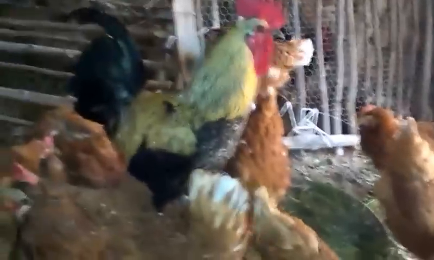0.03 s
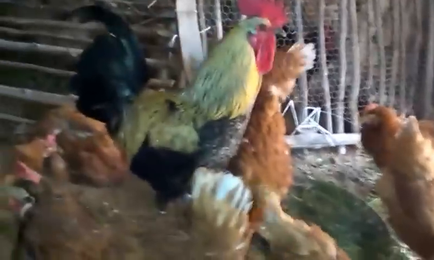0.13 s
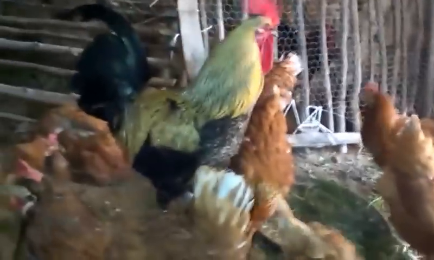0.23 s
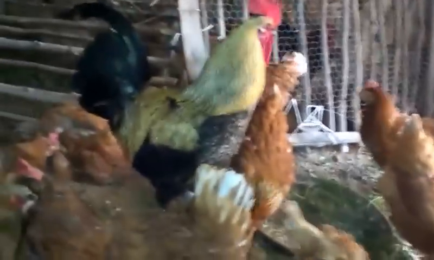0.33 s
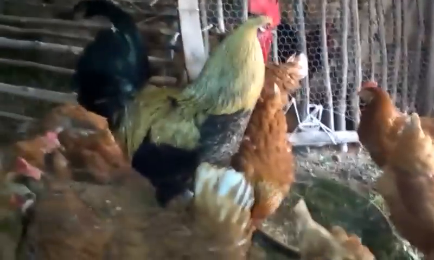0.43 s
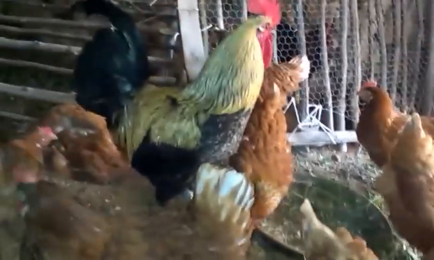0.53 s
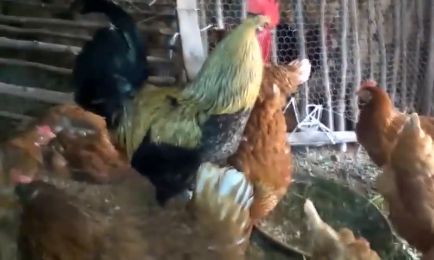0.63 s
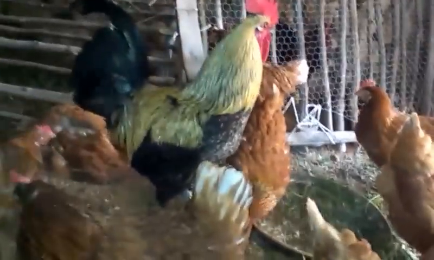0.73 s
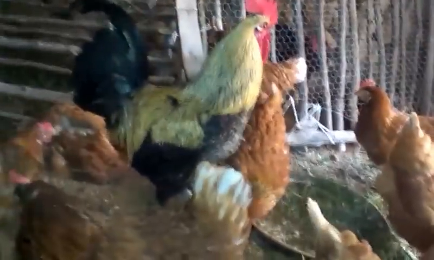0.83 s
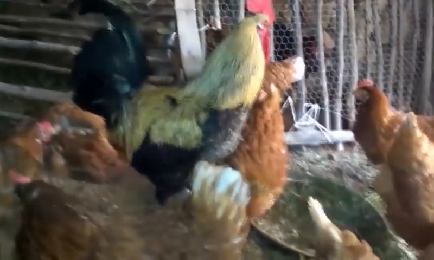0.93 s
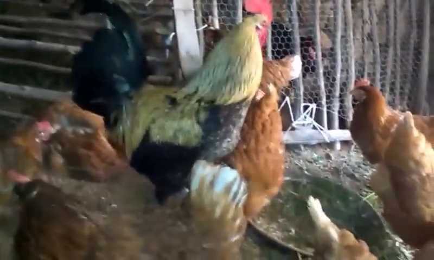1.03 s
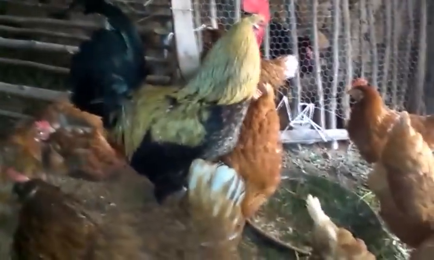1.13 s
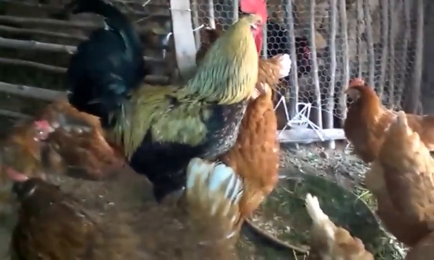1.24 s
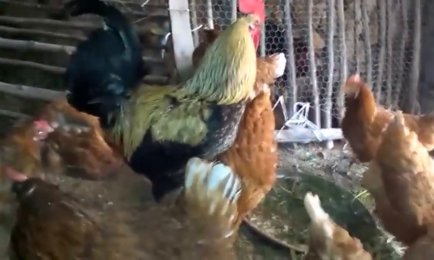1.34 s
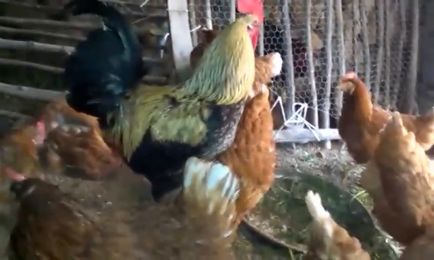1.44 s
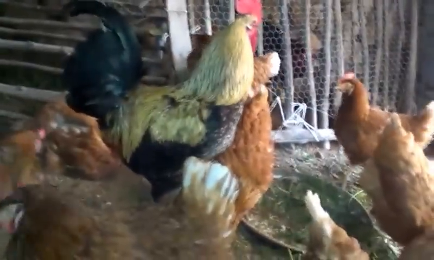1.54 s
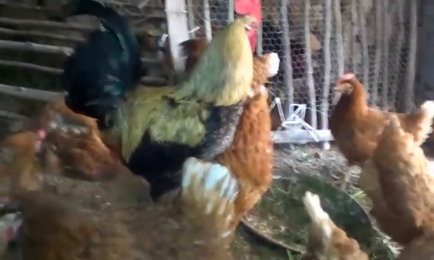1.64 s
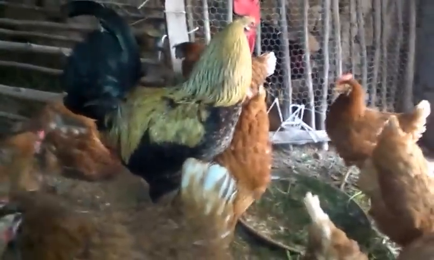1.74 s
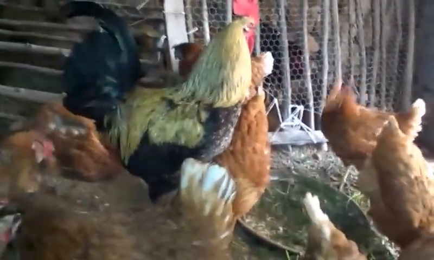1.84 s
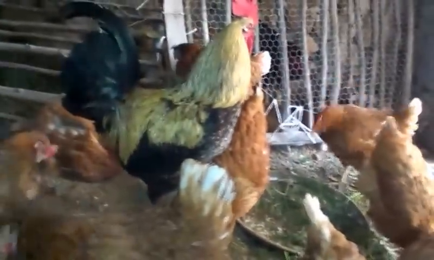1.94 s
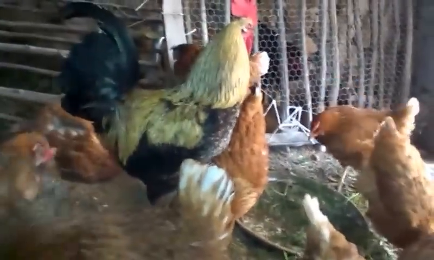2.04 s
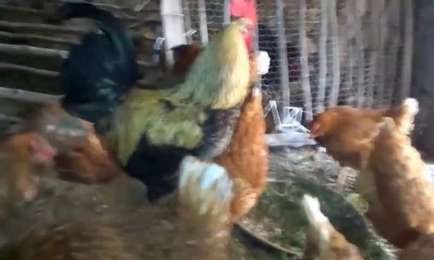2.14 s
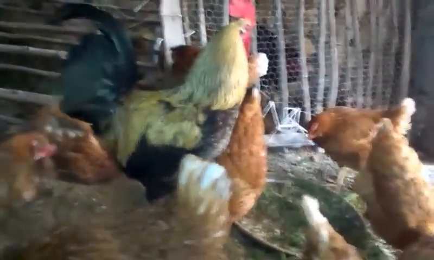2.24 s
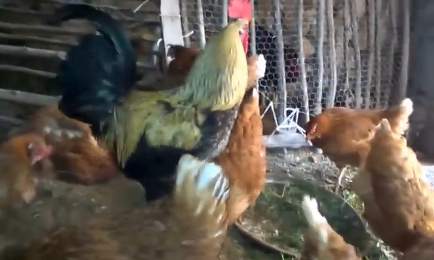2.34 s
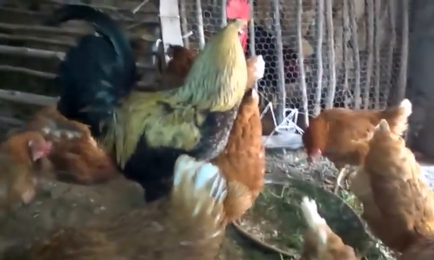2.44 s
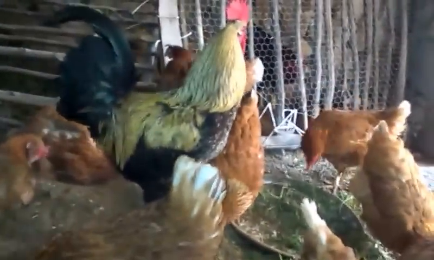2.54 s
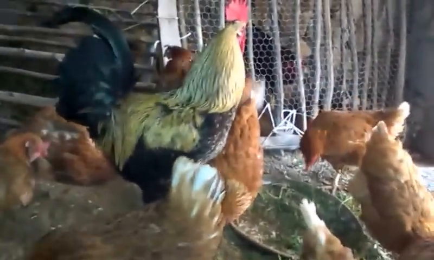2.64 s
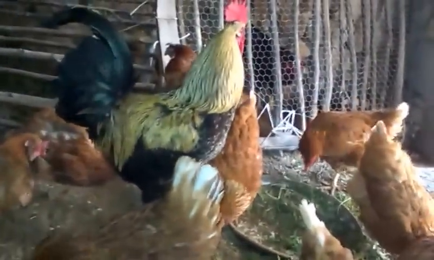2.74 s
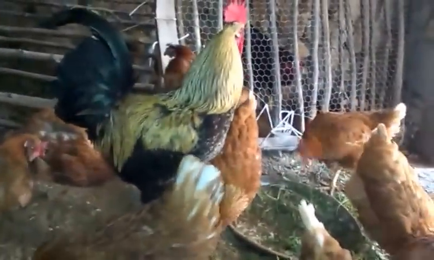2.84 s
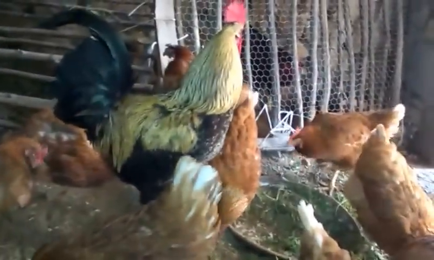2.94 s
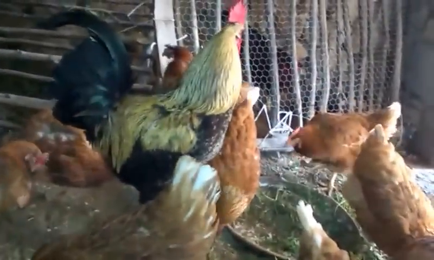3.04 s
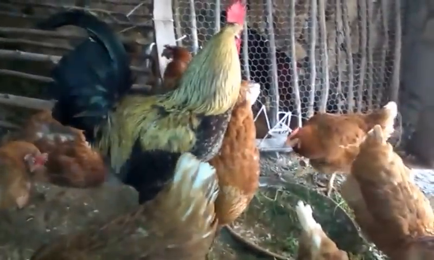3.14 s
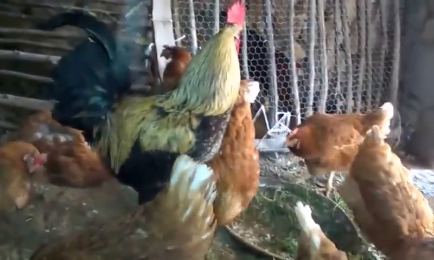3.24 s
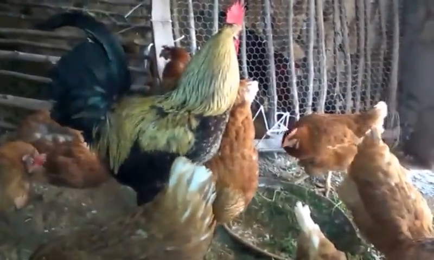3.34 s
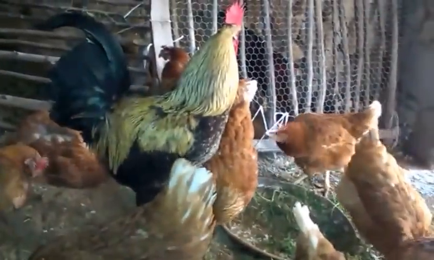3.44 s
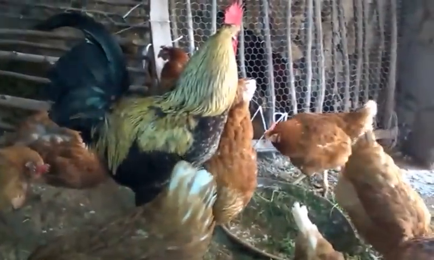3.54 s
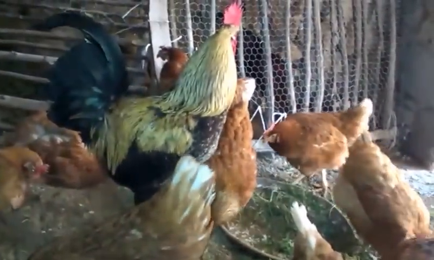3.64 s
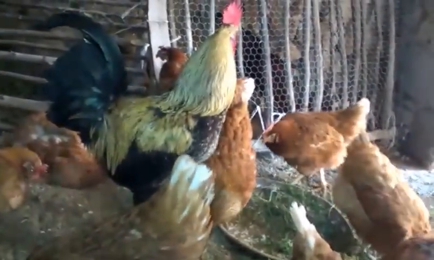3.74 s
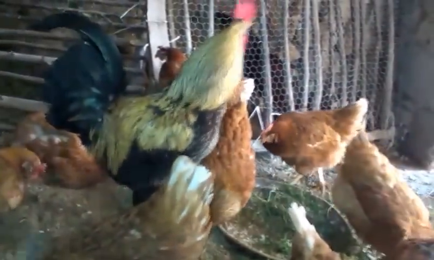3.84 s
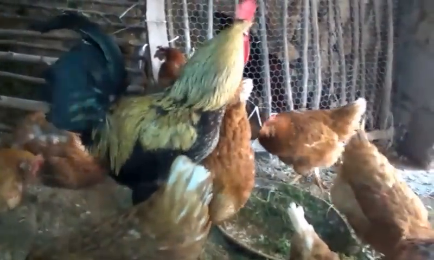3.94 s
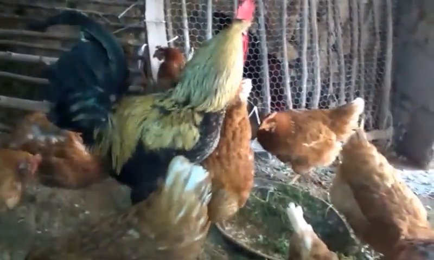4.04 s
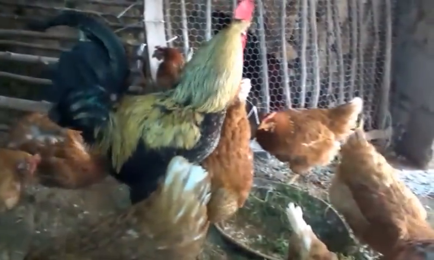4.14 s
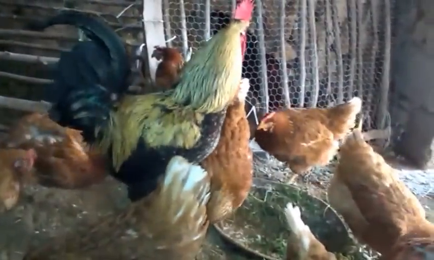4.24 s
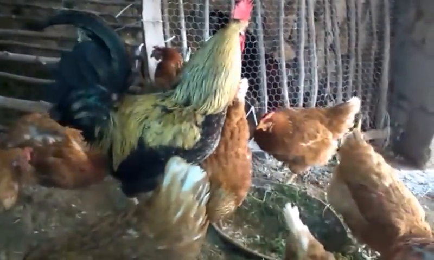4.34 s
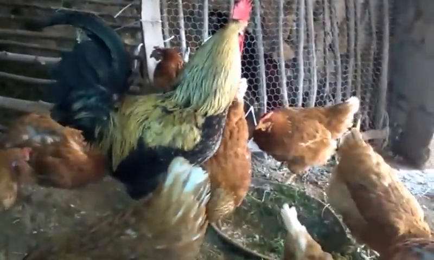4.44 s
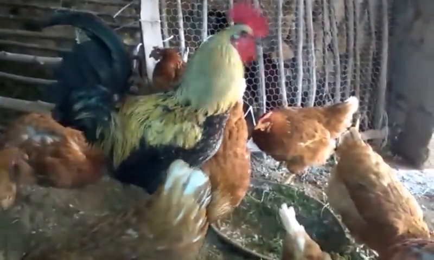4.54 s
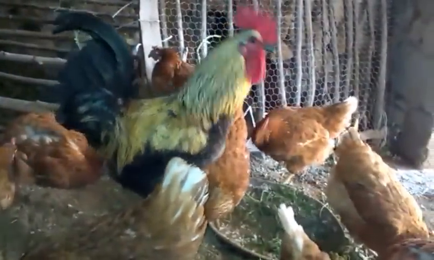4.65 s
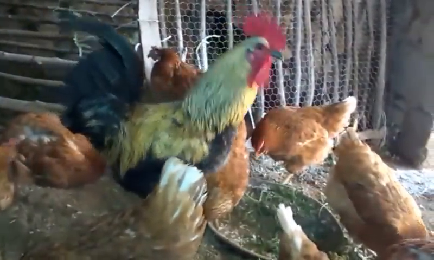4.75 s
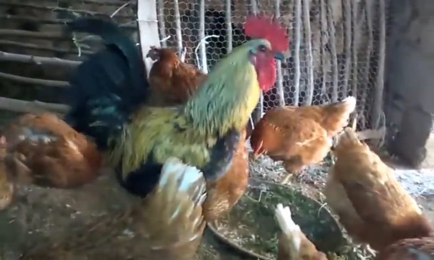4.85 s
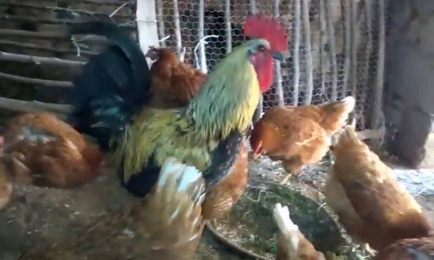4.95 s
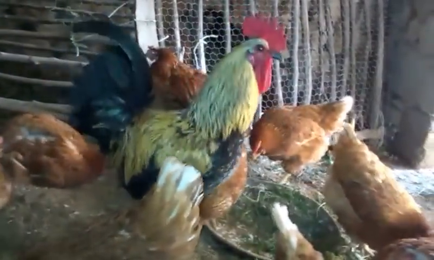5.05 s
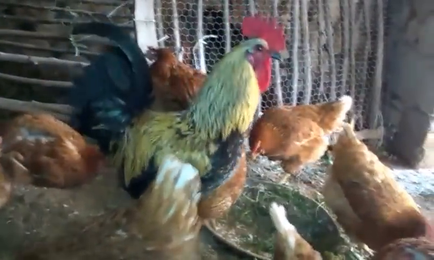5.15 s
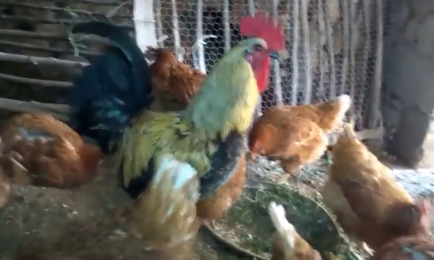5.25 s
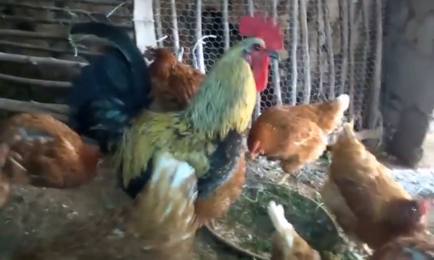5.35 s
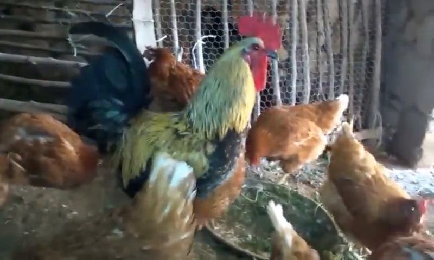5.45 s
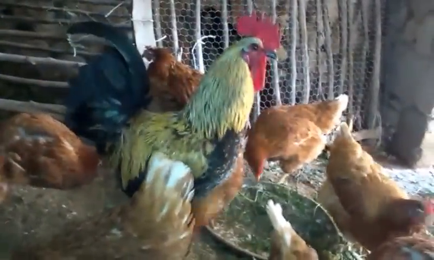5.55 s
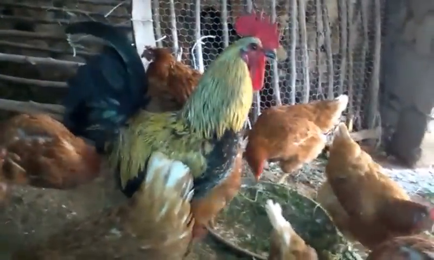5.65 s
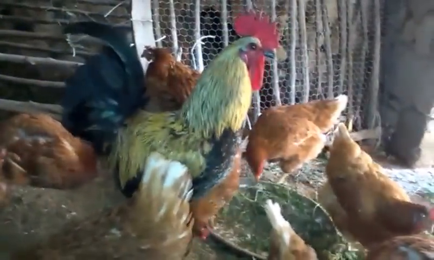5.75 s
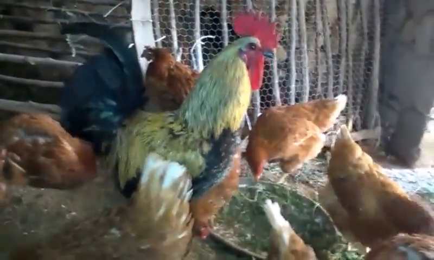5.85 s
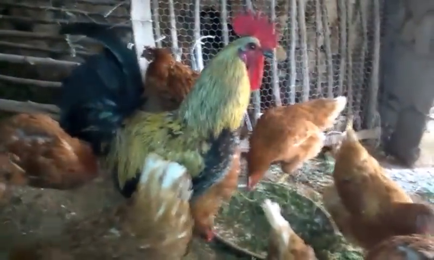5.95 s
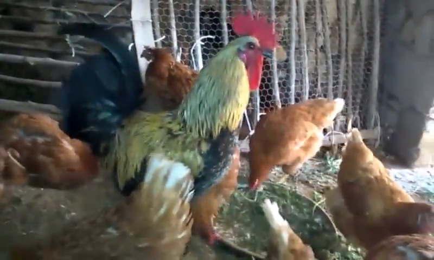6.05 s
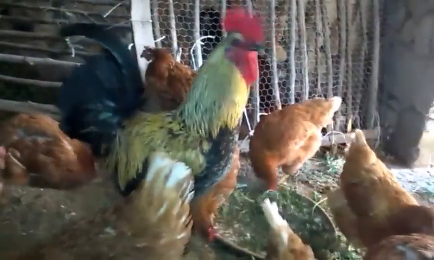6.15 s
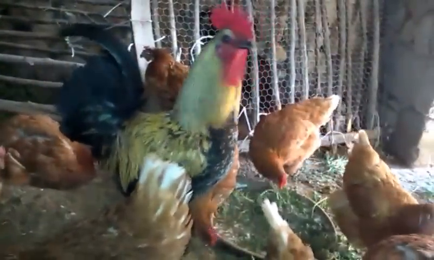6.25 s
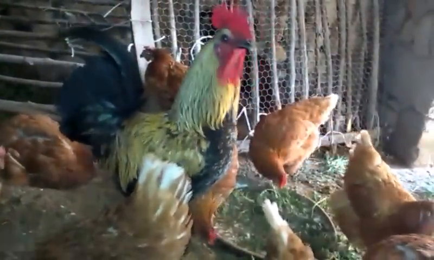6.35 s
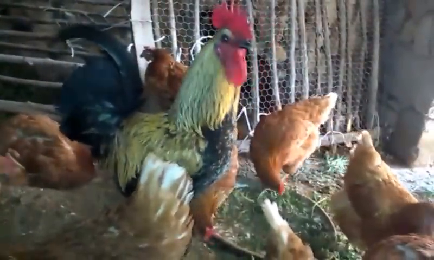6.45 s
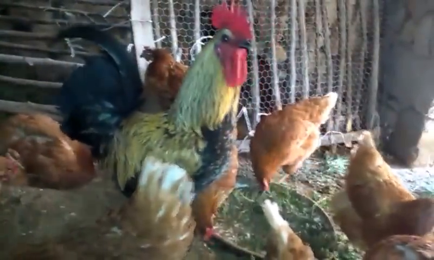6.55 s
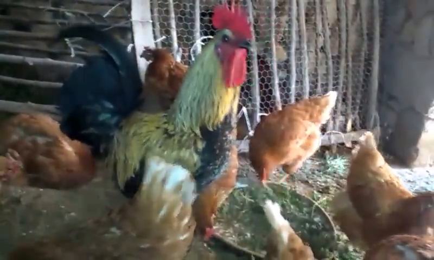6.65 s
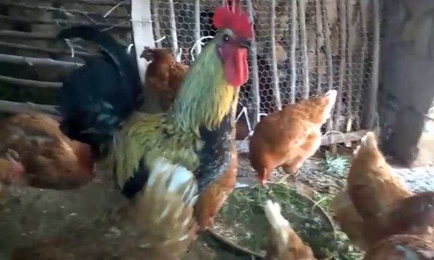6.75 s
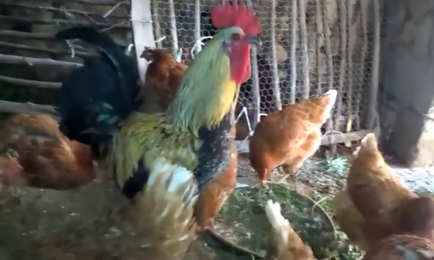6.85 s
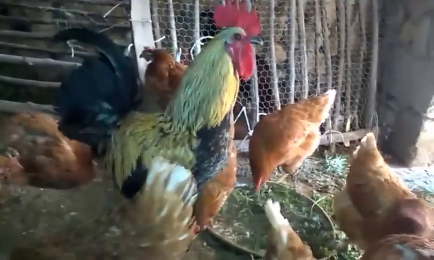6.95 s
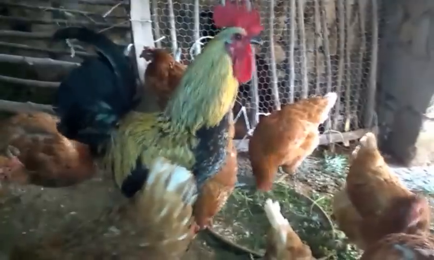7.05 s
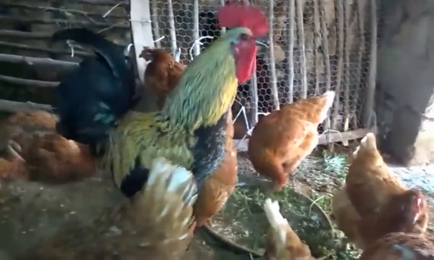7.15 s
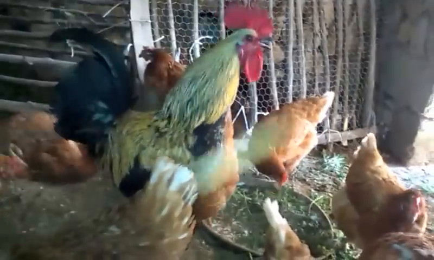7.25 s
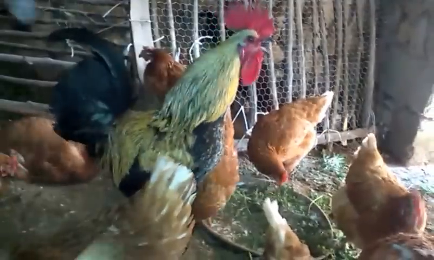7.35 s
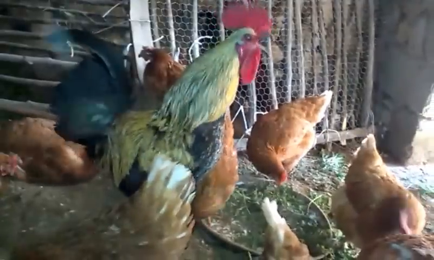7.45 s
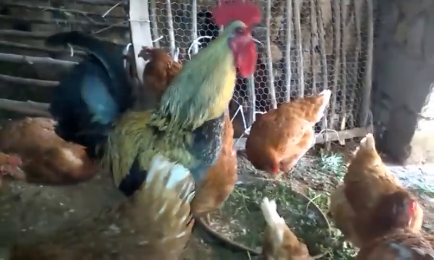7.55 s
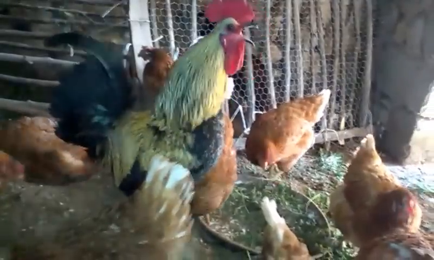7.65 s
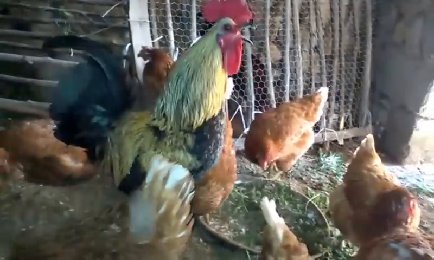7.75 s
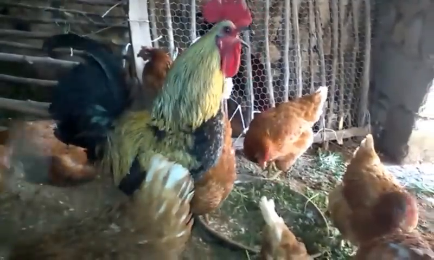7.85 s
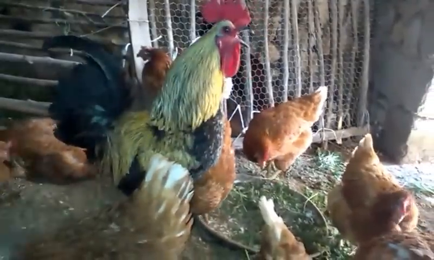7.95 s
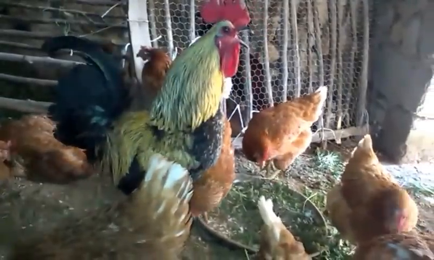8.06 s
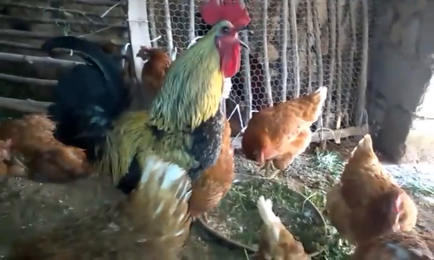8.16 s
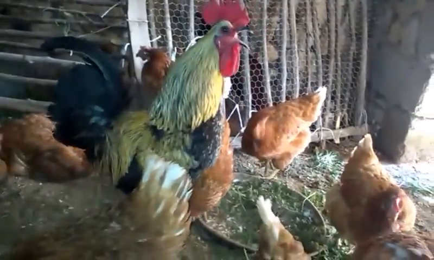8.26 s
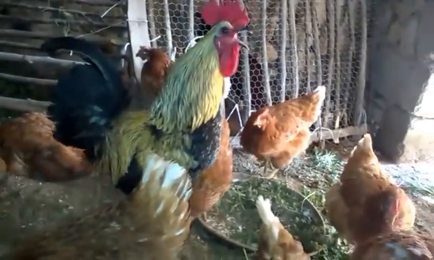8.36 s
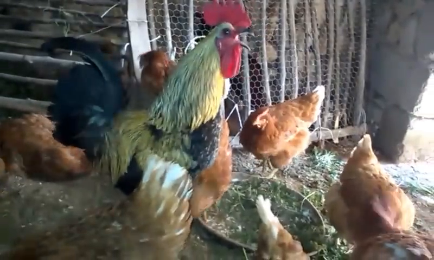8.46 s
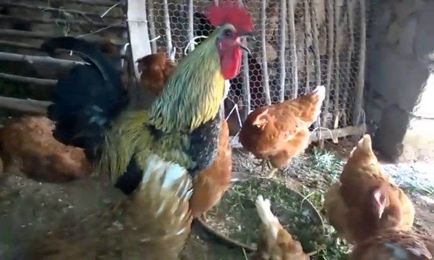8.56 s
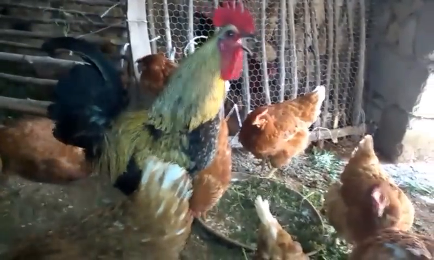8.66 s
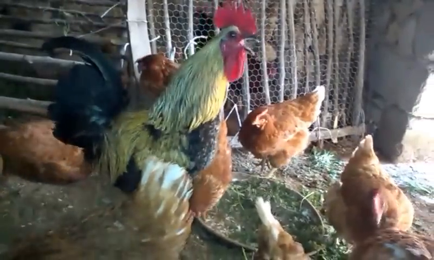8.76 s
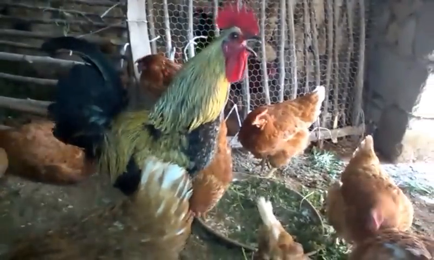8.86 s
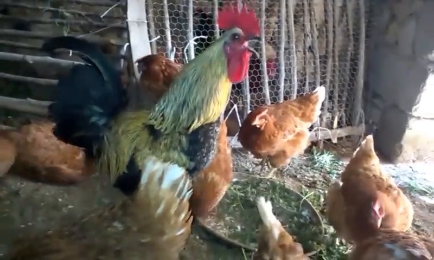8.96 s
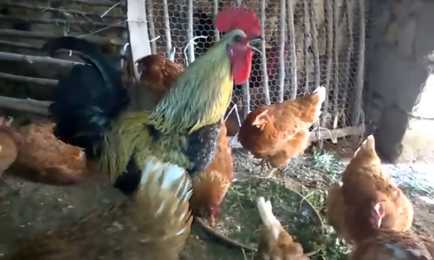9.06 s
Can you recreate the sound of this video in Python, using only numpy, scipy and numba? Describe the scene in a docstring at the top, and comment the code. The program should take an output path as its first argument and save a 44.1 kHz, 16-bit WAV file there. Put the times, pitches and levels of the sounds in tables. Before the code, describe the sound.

Faint hiss of an outdoor coop, with crisp scratches and dry rustles near the microphone, soft throaty hen clucks, a barely audible low drone and one tiny high bird whistle. Irregular small taps on wood follow. Things grow sparser, then a close rooster bursts in, rough at first, breaking through two strong syllables and a brief gravelly flutter into a bright, nasal, held cry with a short faint echo, cut off while still sounding.

```python
"""In a quiet chicken run, hens scratch in dry litter, peck at wood and cluck softly over a steady yard hiss.
Scratches and leaves are shaped noise, pecks are ringing wood, clucks are pulses through a throat.
A low hum drones for a while and a small bird whistles faintly; both are wavering tones.
Then a rooster crows close by: a hoarse opening, two clearer syllables broken by rasps, and a long held note.
Its clear voice is a stack of overtones, its hoarse voice uneven pulses ringing the throat."""
import sys
import numpy as np
from scipy import signal
from scipy.fft import rfft, irfft
from scipy.io import wavfile
from scipy.ndimage import uniform_filter1d
from numba import njit

SR = 44100
rng = np.random.default_rng(int(sys.argv[2]) if len(sys.argv) > 2 else 0)


def transcribe(signal):
    """Save signal, clipped to [-1, 1], as a 16-bit WAV file at the path in sys.argv[1]."""
    frames = np.atleast_2d(signal).T
    limited = np.clip(frames, -1, 1)
    pcm = np.round(limited * 32767).astype(np.int16)
    wavfile.write(sys.argv[1], SR, pcm)


N = 402633
T = np.arange(N) / SR  # time of every sample, in seconds

# Colour of the yard air, shape only: pitch_hz, level_db (per Hz)
YARD_COLOUR = [(12, -24), (20, -11), (35, -18), (55, -23), (166, -20), (466, -24), (633, -24.5), (935, -27),
               (3280, -32.5), (6050, -31.5), (15600, -41.5)]
YARD_DB = -65.5  # loudness of the whole yard noise
# Low hum, then a later one: start_s, pitch_hz, level_db
HUM_CURVE = [(0, 148.7, -66.5), (1.87, 144.5, -67.5), (3.14, 150, -69.5), (3.5, 151.9, -63.5),
             (3.85, 153.2, -65), (3.92, 155, -79)]
LATE_HUM_CURVE = [(8.2, 185, -76), (8.3, 182, -71.5), (9.13, 178, -73)]
# Small bird's whistle: start_s, pitch_hz, level_db
WHISTLE_CURVE = [(1.52, 8340, -72), (1.56, 8430, -76), (1.67, 8600, -78.5), (1.75, 8400, -79),
                 (1.83, 8540, -76), (1.9, 7720, -99)]
# Feet shuffling in dry leaves, one bout a row: middle_s, half_length_s, level_db
SHUFFLE_BOUTS = [(0.273, 0.37, -54), (1.306, 0.3, -65.5), (2.385, 0.16, -51.5), (3.03, 0.16, -59),
                 (3.682, 0.16, -60), (6.076, 0.11, -65), (7.104, 0.24, -68)]
STIR_DB = -72  # leaves between the bouts
# Light pecks on wood: start_s, peak_db
PECK_TIMES = [(3.379, -49), (3.569, -53), (3.716, -52), (4.31, -56.5), (4.4684, -55), (4.85, -55.5),
              (5.168, -53), (5.387, -52.5), (5.7127, -52), (5.8377, -50), (6.0043, -54), (6.2008, -53),
              (6.746, -53), (6.9043, -53), (7.39, -54)]
# Ringing modes of the perch: pitch_hz, level_db, time_to_fall_60_db_s
PERCH_MODES = [(970, 2, 0.057), (1164, 9, 0.038), (2003, 0, .02)]
# Claws and beaks in the litter: start_s, body_peak_db, body_hz, time_to_fall_60_db_s, crackle_peak_db
SCRATCH_STROKES = [(0.085, -35.5, 1060, 0.13, -78), (0.16, -35.5, 1010, 0.093, -39),
                   (0.382, -34, 1040, 0.17, -41.5), (1.052, -50, 1420, 0.12, -52),
                   (1.917, -45.5, 985, 0.025, -74), (2.16, -45, 2350, 0.039, -81),
                   (2.358, -34, 1450, 0.049, -71), (2.432, -34.5, 750, 0.041, -32.5),
                   (2.828, -46.5, 917, 0.19, -45), (3.012, -45, 730, 0.097, -44),
                   (3.149, -42.5, 703, 0.15, -41.5), (3.188, -48.5, 2260, 0.15, -42),
                   (3.393, -38, 1270, 0.11, -75), (3.647, -44, 1090, 0.059, -50.5),
                   (3.739, -39, 1380, 0.18, -39.5), (3.774, -39.5, 2880, 0.072, -36),
                   (4.046, -47.5, 1010, 0.13, -53), (4.544, -41, 1390, 0.068, -44),
                   (5.032, -33.5, 2100, 0.063, -37), (6.039, -53, 1150, 0.054, -52.5),
                   (6.11, -50.5, 964, 0.041, -58), (7.244, -44.5, 1770, 0.053, -80)]
# Hen clucks: start_s, pitch_hz, peak_db, length_s, beak_opening_db
CLUCK_NOTES = [(0.171, 332.6, -36.5, 0.057, -2), (0.219, 288, -40, 0.05, -7), (0.25, 315, -38.5, 0.028, 3),
               (0.28, 311.4, -40, 0.096, 1.5), (0.767, 306, -41.5, 0.05, 1),
               (1.266, 322, -36.5, 0.042, 6.5), (1.915, 256, -43.5, 0.048, -2),
               (2.067, 325, -50, 0.126, -32), (4.128, 259, -50.5, 0.058, -3)]
# Hen's throat resonances: centre_hz, width_hz, relative_gain_db
HEN_RESONANCES = [(296, 820, 14), (690, 350, 11), (920, 240, 18.5), (1234, 420, 7)]
# Course of the crow: start_s, pitch_hz, clear_db (against the held note), hoarse_db
CROW_CURVE = [(7.46, 510, -50, -40), (7.466, 530, -50, -21), (7.5, 516, -45, -19), (7.64, 527, -24, -15),
              (7.695, 534.8, -6, -15.5), (7.73, 556, 4, -25), (7.765, 553, 4, -42.5),
              (7.8, 500.8, -2, -26.5), (7.835, 485, -16, -15.5), (7.875, 490, -2, -18),
              (7.925, 542.8, 3, -35.5), (7.975, 555.6, 1.5, -41), (8.005, 558.6, 3, -33.5),
              (8.035, 561.8, 6, -26), (8.155, 547, -2.5, -24.5), (8.19, 551.4, 0.5, -43),
              (8.25, 554, 0, -53), (8.3, 574, -1, -50.5), (8.33, 571.7, -1.5, -53),
              (8.42, 558.6, -0.5, -54.5), (9.13, 557.4, 0, -55.5)]
# Strong overtones: multiple, syllables_db, held_note_db, head_turned_db
STRONG_OVERTONES = [(1, -26, -21, -19), (2, -21, -13, -14.5), (3, -16, -17, -24.5), (4, -26, -25, -28),
                    (5, -35.5, -24, -18.5), (6, -33.5, -32, -44.5), (9, -36.5, -32, -48.5)]
# Weaker overtones: held_note_db, head_turned_db
WEAK_OVERTONES = [(-46, -44.5), (-51, -57), (-37.5, -40), (-50.5, -61), (-45.5, -44.5), (-61.5, -35.5),
                  (-45, -39.5), (-52.5, -34), (-46, -51), (-59.5, -62.5), (-66, -77), (-73, -56),
                  (-52.5, -77.5), (-74, -68), (-71.5, -60.5), (-54, -49.5), (-67, -59), (-81, -71),
                  (-70, -63), (-56.5, -69)]
WEAK_MULTIPLES = [7, 8, *range(10, 28)]  # multiples of the pitch, one for each row above
# Narrow dips and peaks that overtones glide through: centre_hz, half_width_hz, gain_db
NARROW_RESONANCES = [(1727.5, 21, -14.5), (2826, 13.1, -18.5), (2952, 92, 19.5), (5087, 126, 8)]
# Rasps, the voice flipping briefly into a higher register: middle_s, pitch_hz, level_db, length_s
RASP_BURSTS = [(8.013, 632, -9.5, 0.021), (8.055, 627, -6, 0.024), (8.081, 639.5, -5, 0.038),
               (8.111, 619.6, -10, 0.018), (8.14, 636, -8, .03)]
# Overtones of a rasp, from the first up: relative_level_db
RASP_OVERTONE_LEVELS = [-5.5, -5, -10, -17.5, -16, -22]
# Rooster's throat resonances: centre_hz, width_hz, relative_gain_db
ROOSTER_RESONANCES = [(648, 480, -6), (962, 180, -0.5), (1350, 420, -2), (1873, 560, -3.5),
                      (2947, 210, -5.5), (3870, 1900, -21.5), (5184, 290, -13), (6540, 1100, -19.5),
                      (8120, 1700, -18.5), (12600, 5000, -36)]
# Neck movement: start_s, stretch (multiplies the low throat resonances)
NECK_STRETCH = [(7.46, 0.95), (7.6, 1.01), (7.7, 1.052), (7.83, 1.076), (7.95, 1.03), (8.2, 1.0)]
OPEN_S = 8.17, 8.28  # the beak opens wide for the held note
TURN_S = 8.72, 9.06  # the head turns and the overtones change balance
SYLLABLE_LIFT_DB, LIFT_BELOW_HZ = 6, 6500  # weaker overtones under this stand out before the beak opens
UNSTEADY_PITCH, THROB_DB = 0.006, 1.3  # extra pitch waver (as a fraction) and throb before the beak opens
TOP_HZ = 15740  # upper edge of the finished sound


def undb(db):
    """Turns decibels into a gain."""
    return 10 ** (np.asarray(db) / 20)


def unit(x):
    """Scales a sound to an average (rms) level of 1."""
    return x / np.sqrt(np.mean(x ** 2))


def play(rows):
    """Draws each column as a curve over time, plus a gate that is open while the rows last."""
    s, *columns = np.transpose(rows)
    is_on = 1. * ((T >= s[0]) & (T <= s[-1] + 0.06))
    gate = uniform_filter1d(is_on, size=101)
    return [np.interp(T, s, c) for c in columns] + [gate]


def resonance(x, hz, width_hz):
    """A hollow rings at its own pitch: a two-pole filter with gain 1 at the centre."""
    return signal.lfilter(*signal.iirpeak(hz, hz / width_hz, SR), x)


@njit
def moving_resonance(x, hz, width_hz):
    """A hollow that changes shape: a band-pass whose centre moves every sample, gain 1 at the centre."""
    y, band, low = np.empty(len(x)), 0., 0.
    for i in range(len(x)):
        g, damping = np.tan(np.pi * hz[i] / SR), width_hz / hz[i]
        v = (band + g * (x[i] - low)) / (1 + g * (g + damping))
        band, low, y[i] = 2 * v - band, low + 2 * g * v, damping * v
    return y


def walk(rate, length=N):
    """A random wander: about rate new levels a second, smoothed twice, with a spread near 1."""
    hold = int(SR / rate)
    steps = np.repeat(rng.standard_normal(length // hold + 1), hold)
    smooth = uniform_filter1d(uniform_filter1d(steps, hold), hold)
    return 1.492 * smooth[:length]


def add(out, s, x):
    """Mixes x into out from time s."""
    i = int(s * SR)
    out[i:i + len(x)] += x[:N - i]


def beats(hz, jitter, scatter_db, weak_db, length):
    """One pulse a cycle; each has its own length and strength, and every second one is shifted by weak_db."""
    # room for 800 cycles a second
    length_chance, strength_chance = rng.standard_normal((int(length * 800 / SR) + 2, 2)).T
    cycles = np.cumsum(hz[:length]) / SR
    due = np.cumsum(np.clip(1 + jitter * length_chance, 0.3, 2))
    at = np.interp(due, cycles, np.arange(length), right=length - 2)
    size_db = scatter_db * strength_chance + weak_db * (np.arange(len(at)) % 2)
    size = undb(size_db) * (at < length - 2)
    # a pulse between two samples is shared by both
    whole = at.astype(int)
    part = at - whole
    return np.bincount(whole, size * (1 - part), length) + np.bincount(whole + 1, size * part, length)


def yard():
    """Steady outdoor air and hiss: noise coloured by a curve, with a tiny wander in level."""
    hz, db = np.transpose(YARD_COLOUR)
    f = np.fft.rfftfreq(N, 1 / SR)
    colour = undb(np.interp(np.log(f + 1), np.log(hz), db))
    air = irfft(rfft(rng.standard_normal(N)) * colour, N)
    return unit(air) * undb(YARD_DB + 0.067 * walk(8.3))


def wavering_tone(rows, waver, octave_db):
    """A hum or whistle: a wavering tone with its octave."""
    hz, db, gate = play(rows)
    phase = 2 * np.pi * np.cumsum(hz * (1 + waver * walk(20))) / SR
    wave = np.sin(phase) + undb(octave_db) * np.sin(2 * phase)
    return np.sqrt(2) * gate * undb(db + 1.8 * walk(7.7)) * wave


def rustle():
    """Dry leaves crackle in many tiny uneven grains: a bright crackle over a slightly stronger, duller body."""
    bouts = sum(undb(db - 8.8 * ((T - s) / half) ** 2) for s, half, db in SHUFFLE_BOUTS)
    swell = undb(STIR_DB) + bouts
    grit = np.repeat(rng.exponential(size=N // 30 + 1), 30)[:N]
    grains = rng.standard_normal(N) * undb(1.7 * grit + 3.8 * walk(25))
    bright = unit(resonance(resonance(grains, 4620, 4900), 3750, 4200))
    body = unit(resonance(resonance(grains, 780, 2800), 740, 4100))
    return swell * (0.4 * bright + 0.52 * body)


def pecks():
    """A beak scuffs the wood for a few milliseconds and rings its modes."""
    out, t = np.zeros(N), T[:SR // 8]
    for s, db in PECK_TIMES:
        tune = 1 + 0.05 * rng.standard_normal(len(PERCH_MODES))
        scuff_s = rng.uniform(0.003, 0.01)
        ring = sum(undb(g - 60 * t / t60) * np.sin(2 * np.pi * f * v * t)
                   for (f, g, t60), v in zip(PERCH_MODES, tune))
        scuff = rng.standard_normal(len(t)) * np.exp(-t / scuff_s)
        tap = signal.fftconvolve(ring, scuff)[:len(t)]
        add(out, s, undb(db) * tap / np.abs(tap).max())
    return out


def scratches():
    """Each stroke is a cluster of grit clicks: a duller body and a bright crackle that die together."""
    out, t = np.zeros(N), T[:SR // 4]
    for s, db, hz, t60, crackle_db in SCRATCH_STROKES:
        noise = rng.standard_normal(len(t))
        grit = np.repeat(rng.exponential(size=len(t) // 40 + 1), 40)[:len(t)]
        # long strokes swell in, short ones snap
        attack = (1 - np.exp(-t / (0.5 * t60 ** 2))) ** 2
        # a quick fall with a faint tail
        decay = undb(-60 * t / t60) + 0.039 * undb(-60 * t / 0.23)
        burst = noise * undb(2.17 * grit) * attack * decay
        dull = resonance(burst, hz, 0.58 * hz) + 0.5 * resonance(burst, 1800, 2300)
        body = resonance(dull, hz, 6.5 * hz)
        crackle = resonance(resonance(burst, 5500, 3000), 2600, 4600)
        body = undb(db) * body / np.abs(body).max()
        crackle = undb(crackle_db) * crackle / np.abs(crackle).max()
        add(out, s, body + crackle)
    return out


def clucks():
    """Short pulse trains sag in pitch in a hen's throat; an open beak lifts the upper resonances."""
    out = np.zeros(N)
    for s, hz, db, length, open_db in CLUCK_NOTES:
        u = np.linspace(0, 1, int(length * SR))  # progress through the cluck
        pulses = beats(hz * (1.05 - 0.091 * u), jitter=0.03, scatter_db=2.5, weak_db=-3.0, length=len(u))
        shape = np.minimum(u / 0.034, 1) * (1 - u ** 2.6)
        pulses = np.pad(pulses * shape, (0, 999))  # silence for the throat to ring out
        voice = 0
        for k, (f, w, g) in enumerate(HEN_RESONANCES):
            gain = (-1) ** k * undb(g + open_db * (k > 1))
            voice = voice + gain * resonance(resonance(pulses, f, w), f, w)
        add(out, s, undb(db) * voice / np.abs(voice).max())
    return out


def rasps():
    """The voice flips into short wobbling tones; returns them and how far each ducks the clear voice."""
    out, duck = np.zeros(N), np.zeros(N)
    for s, hz, db, length in RASP_BURSTS:
        shape = np.hanning(int(length * SR))
        phase = np.cumsum(hz * (1 + 0.0248 * walk(213.0, len(shape)))) * 2 * np.pi / SR
        tone = sum(undb(g) * np.sin((k + 1) * phase) for k, g in enumerate(RASP_OVERTONE_LEVELS))
        add(out, s - length / 2, undb(db) * shape * unit(tone))
        add(duck, s - length / 2, 0.75 * shape)
    return out, duck


def hoarse_voice(stretch):
    """Uneven strong-weak pulses ring the throat; steady lung pressure evens out their loudness."""
    pulse_hz = 660 * stretch * (1 + 0.04 * walk(50, len(stretch)))
    pulses = beats(pulse_hz, jitter=0.06, scatter_db=3.3, weak_db=-6.0, length=len(stretch))
    rough = 0
    for k, (hz, width_hz, db) in enumerate(ROOSTER_RESONANCES):
        # the low resonances follow the neck, the beak's barely move
        centre = hz * stretch ** (1 if hz < 2500 else -0.3)
        # filtering twice keeps the valleys dark
        once = moving_resonance(pulses, centre, 1. * width_hz)
        twice = moving_resonance(once, centre, 1. * width_hz)
        rough = rough + (-1) ** k * undb(db) * twice / np.sqrt(width_hz)
    power = uniform_filter1d(uniform_filter1d(rough ** 2, size=900), size=900)
    return rough / np.sqrt(power + 1e-12)


def overtone_db(hz, posture, dbs):
    """One overtone's level follows the posture, and dips or swells where it crosses a narrow resonance."""
    narrow = sum(db / (1 + ((hz - f) / w) ** 2) for f, w, db in NARROW_RESONANCES)
    return np.interp(posture, range(len(dbs)), dbs) + narrow


def clear_voice(hz, phase, posture, veil):
    """Sine overtones of the pitch; hoarseness (veil) makes them flutter and dulls the weaker ones."""
    flutter = [undb(veil * (3.2 * walk(200, len(hz)) - 2)) for _ in range(3)]
    clear = 0
    for k, *dbs in STRONG_OVERTONES:
        level_db = overtone_db(k * hz, posture, dbs)
        clear = clear + undb(level_db) * flutter[k % 3] * np.sin(k * phase + k * k)
    for k, (db, turned_db) in zip(WEAK_MULTIPLES, WEAK_OVERTONES):
        syllable_db = db + SYLLABLE_LIFT_DB * (k * hz[-1] < LIFT_BELOW_HZ)
        level_db = overtone_db(k * hz, posture, (syllable_db, db, turned_db))
        level_db = level_db - 1.8 * veil * max(k - 9, 2) + 2 * walk(9.8, len(hz))
        clear = clear + undb(level_db) * flutter[k % 3] * np.sin(k * phase + k * k)
    return clear


def crow():
    """Overtones on the pitch, smeared when hoarse and ducked by rasps, over the hoarse voice."""
    start = int(CROW_CURVE[0][0] * SR) - 999
    n, t = N - start, T[start:]
    hz, clear_db, hoarse_db, gate = (c[start:] for c in play(CROW_CURVE))
    # the hoarser the voice, the more its pitch and strength shake and the duller its clear part
    shake = np.minimum(undb(hoarse_db + 18.5), 1)
    veil = np.tanh(5 * shake)
    closed = np.interp(t, OPEN_S, (1, 0)) ** 2
    clear_db = clear_db + THROB_DB * closed * walk(60, n)
    fast_waver = (0.026 * shake ** 0.8 + UNSTEADY_PITCH * closed) * walk(300, n)
    phase = 2 * np.pi * np.cumsum(hz * (1 + 0.0009 * walk(60, n) + fast_waver)) / SR
    # posture: 0 in the syllables, 1 with the beak open, 2 with the head turned
    posture = np.interp(t, OPEN_S, (0, 1)) + np.interp(t, TURN_S, (0, 1))
    clear = clear_voice(hz, phase, posture, veil)
    rasp, duck = rasps()
    voiced = np.sqrt(2) * gate * undb(clear_db) * clear * (1 - duck[start:])
    stretch = np.interp(t, *np.transpose(NECK_STRETCH))
    rough = hoarse_voice(stretch) * undb(hoarse_db) * gate
    return rasp + np.pad(voiced + rough, (start, 0))


def scene():
    """Near birds with a short, faint echo off the slats, over the leaves, tones and yard."""
    hums = wavering_tone(HUM_CURVE, 0.01, -12) + wavering_tone(LATE_HUM_CURVE, 0.012, -20)
    whistle = wavering_tone(WHISTLE_CURVE, 0.005, -60)
    near = pecks() + scratches() + clucks() + crow()
    # the echo is fading noise that starts 300 samples late
    slats = rng.standard_normal(SR // 8) * undb(-60 * T[:SR // 8] / 0.26)
    slats = np.pad(slats / np.sqrt(np.sum(slats ** 2)), (300, 0))
    echo = signal.fftconvolve(near, slats)[:N]
    return (yard() + hums + whistle + rustle() + near + undb(-15) * echo)[None]


def record(dry):
    """The loudest peaks flatten, a small constant offset is added, and the top is cut."""
    ceiling = 0.72
    flat = dry / (1 + np.abs(dry / ceiling) ** 10) ** (1 / 10) + 0.0013
    return signal.sosfilt(signal.ellip(10, 0.2, 70, TOP_HZ, fs=SR, output="sos"), flat)


dry = scene()
out = record(dry)
transcribe(out)
```